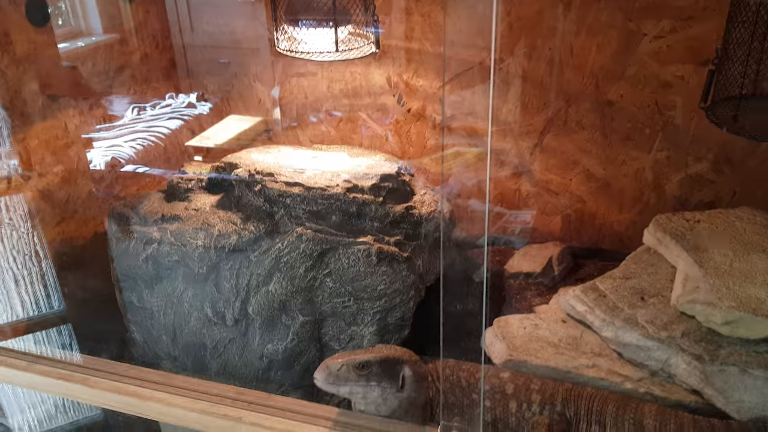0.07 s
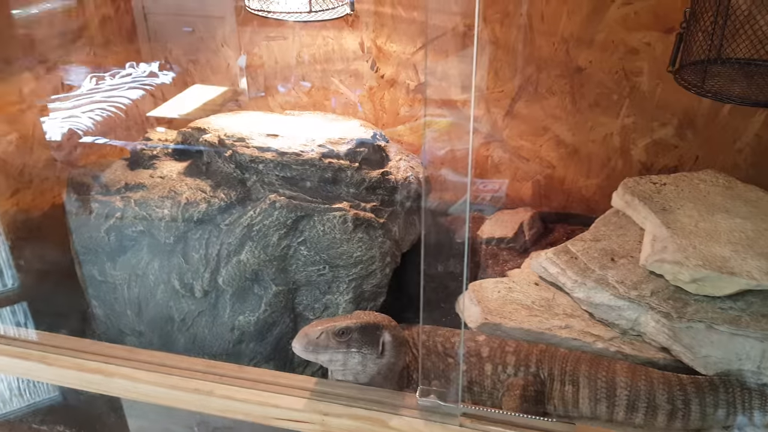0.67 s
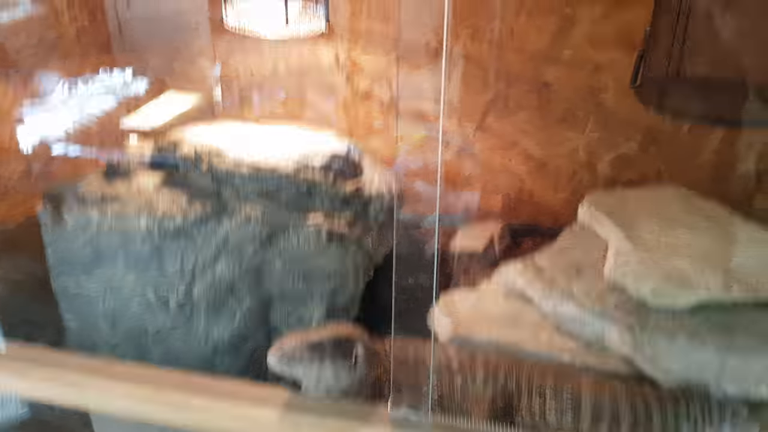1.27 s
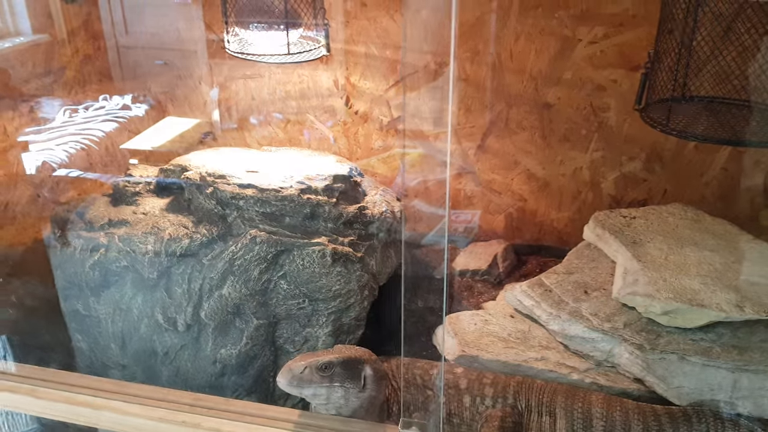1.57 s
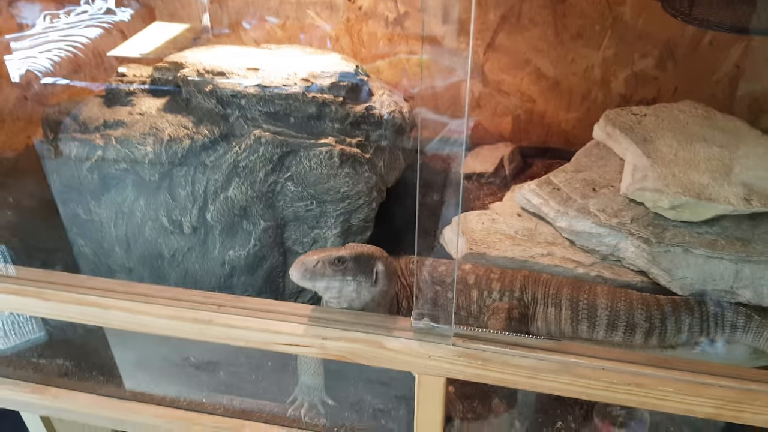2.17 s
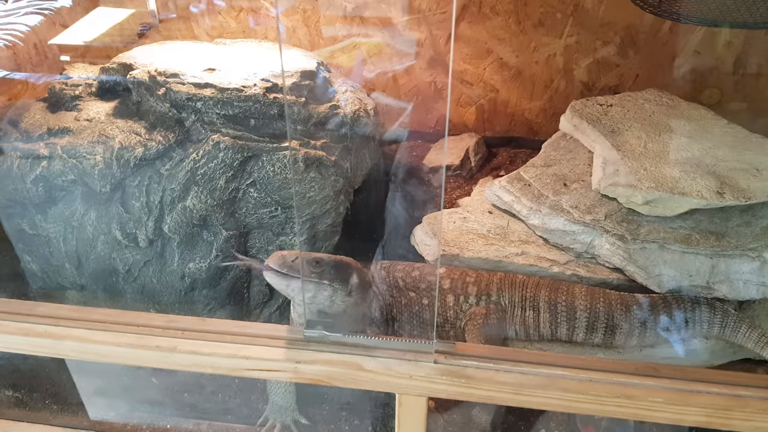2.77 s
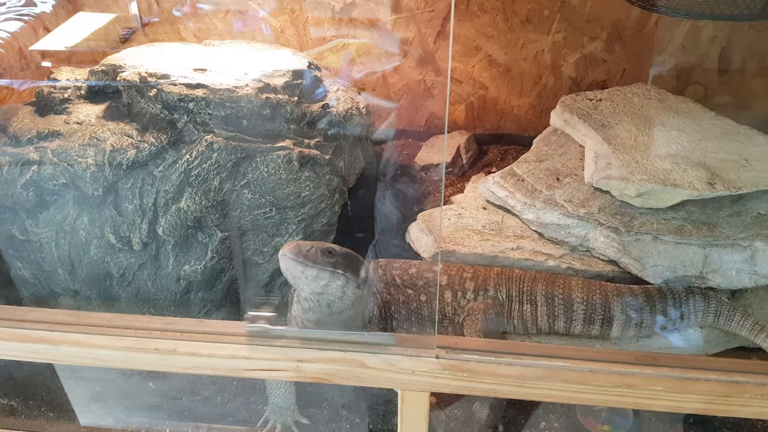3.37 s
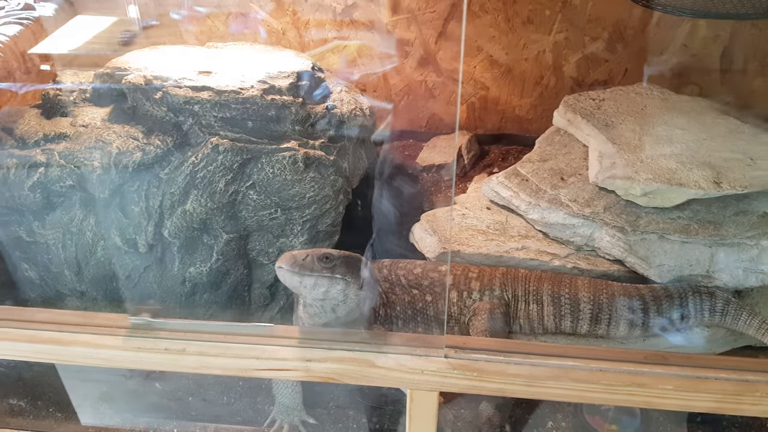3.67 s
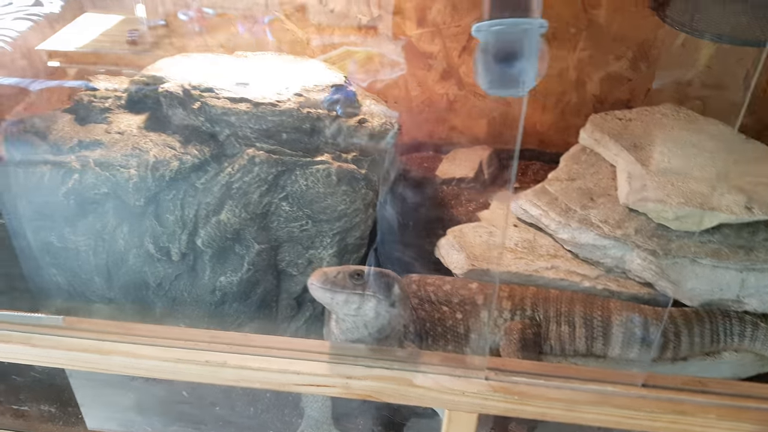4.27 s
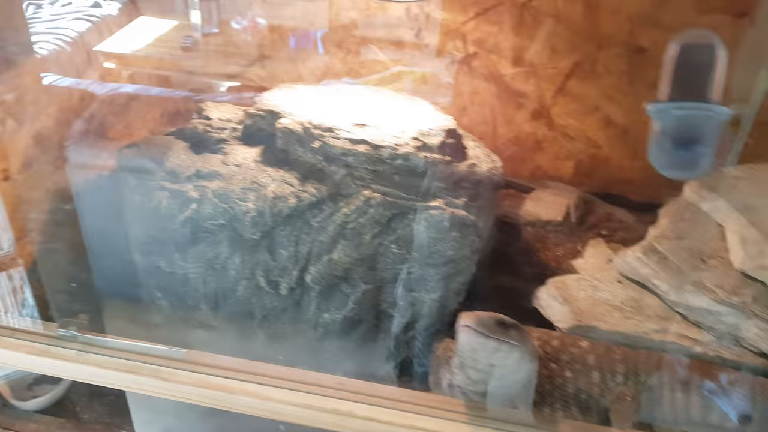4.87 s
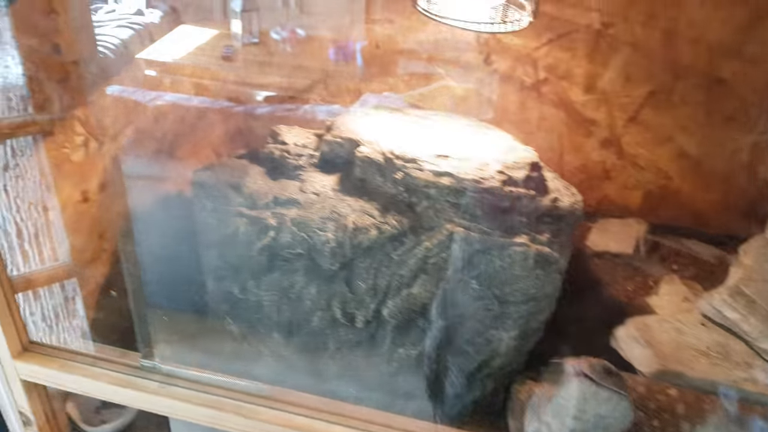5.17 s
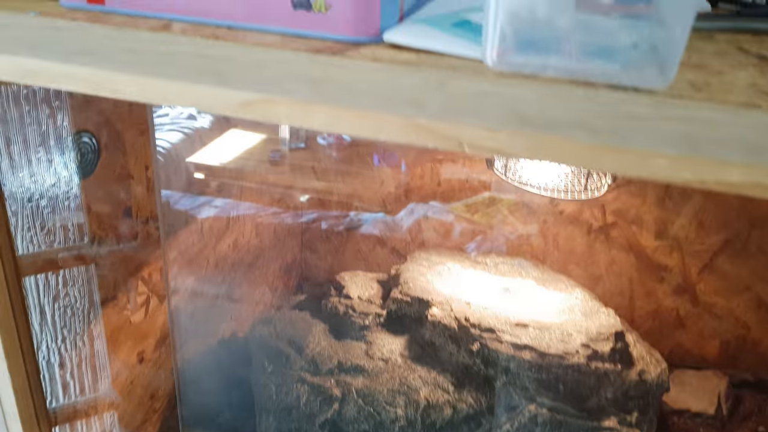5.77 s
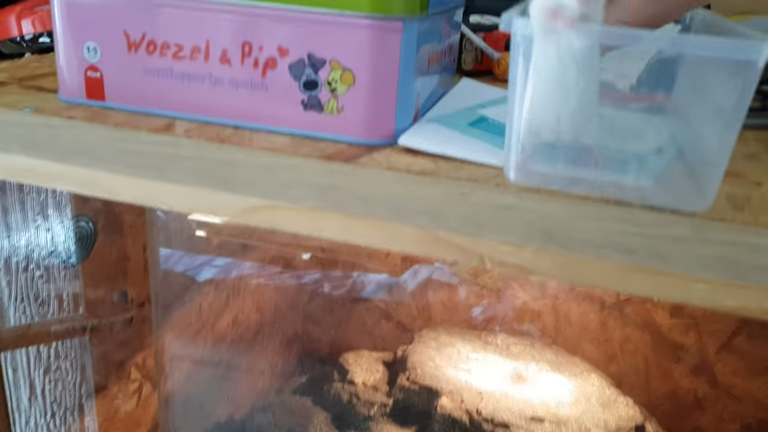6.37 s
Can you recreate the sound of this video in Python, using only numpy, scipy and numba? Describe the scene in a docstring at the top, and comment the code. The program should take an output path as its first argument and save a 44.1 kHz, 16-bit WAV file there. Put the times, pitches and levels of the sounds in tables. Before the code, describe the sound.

A monitor lizard hisses twice in its enclosure, a short breath then a long one, with microphone bumps and a faint hum.

```python
"""A hissing monitor lizard

The lizard hisses twice in a wooden, glass-fronted box: a short breath, then a long one as its mouth
opens. Air tears through the throat, spits, whistles and booms between the walls. Fingers bump the
phone, things knock on the wood, and a faint hum goes on behind it all."""
import sys
import numpy as np
from scipy import signal
from scipy.fft import rfft, irfft
from scipy.io import wavfile
from numba import njit

SR = 44100
rng = np.random.default_rng(int(sys.argv[2]) if len(sys.argv) > 2 else 0)


def transcribe(signal):
    """Save signal, clipped to [-1, 1], as a 16-bit WAV file at the path in sys.argv[1]."""
    frames = np.atleast_2d(signal).T
    limited = np.clip(frames, -1, 1)
    pcm = np.round(limited * 32767).astype(np.int16)
    wavfile.write(sys.argv[1], SR, pcm)


N = 287973
TIME = np.arange(N) / SR

# tone of the quiet room: pitch_hz, level_db
ROOM_TONE = [(25, -0.5), (140, 0), (330, 2.5), (500, -17), (800, -28.5), (4500, -29), (9000, -35.5),
             (13000, -27.5), (16000, -35)]
# tone of a faint, high whirr: pitch_hz, level_db
WHIRR_TONE = [(1000, -16.5), (1600, -5), (1950, -10), (2350, -1), (3100, -1.5), (3450, -8), (3950, 0.5),
              (4400, -28.5), (6000, -45)]
# notes of the hum: pitch_hz, level_db
HUM_NOTES = [(129, -69), (2299, -77), (2412, -78)]
# tone of a dull, low drone: pitch_hz, level_db
DRONE_TONE = [(50, -9.5), (150, -3.5), (480, 5), (800, -18), (2000, -44)]
# swells of that drone: peak_s, level_db
DRONE_SWELLS = [(1.13, -54), (6.33, -54)]
SWELL_RISE_S, SWELL_FALL_DB_PER_S = 0.21, 21.5
DRONE_DB, DRONE_SINK_DB_PER_S = -68.5, 1.1  # between the swells
MOTOR_TURNS_PER_S, MOTOR_HZ, MOTOR_WIDTH_HZ = 20, 2320, 260
MOTOR_DB, RUB_FADE_TURNS = -73.5, .3
NEAR_S, NEAR_HALF_S, NEAR_DB = 4.95, 0.14, 3  # the motor is louder as the phone swings past

# soft scuffs: peak_s, level_db, half_length_s
SCUFFS = [(0.148, -52.5, 0.041), (0.314, -51.5, 0.037), (0.59, -53.5, 0.082), (1.934, -58.5, 0.066),
          (5.257, -55, 0.012), (5.35, -58, 0.022), (5.834, -49, 0.028)]
# tone of a scuff: pitch_hz, level_db
SCUFF_TONE = [(400, 7.5), (1000, -4), (3500, 3), (6500, -3.5), (9000, -17), (16000, -9)]
TAP_S, TAP_DB, TAP_FADE_S = 5.763, -51, 0.007
# fingers bumping the left microphone: start_s, thump_db, click_db
FINGER_BUMPS = [(0.3215, -17, -6.5), (0.5585, -22.5, -38), (.809, -20, -42)]
# ticks of the phone case: start_s, level_db, left_minus_right_db
CASE_TICKS = [(.281, -38.5, 20), (0.3185, -32, 8), (0.32, -27.5, 4), (0.5489, -37, -16),
              (0.5773, -32.5, -11), (0.7562, -35.5, 18.5)]
CASE_RING_HZ = 4170
DRAG_START_S, DRAG_LENGTH_S, DRAG_RELEASE_S = .812, 0.061, 0.018
DRAG_DB, DRAG_GROWTH_DB_PER_S = -47.5, 229  # the dragging finger presses ever harder
# knocks on the wood, dull handling bumps and a low thud of breath as the first hiss ends:
# start_s, level_db, treble_limit_hz
KNOCKS_AND_THUDS = [(2.149, -40, 290), (2.745, -41.5, 200), (2.886, -40.5, 100), (2.924, -40, 114),
                    (3.066, -39.5, 121), (3.136, -37, 650), (5.254, -40, 1640), (5.304, -51, 1000),
                    (5.372, -47.5, 1504), (6.123, -50, 280)]
# notes of the wooden frame (a ring time is a fall of 60 dB): pitch_hz, level_db, ring_s
WOOD_NOTES = [(163.7, -3.5, 0.18), (245, 6, 0.027), (304, 0, 0.15), (396, -2.5, 0.067), (486, -6, 0.0703),
              (700, -9, .08), (850, -9.5, 0.12), (1883, -15.5, .07)]

# a short hiss, its sigh, a faint leak and a long hiss (mouth and boom count from the jet's level):
# start_s, length_s, rise_s, jet_db, growth_db_per_s, mouth_db, opening_db_per_s, boom_db
BREATHS = [(2.248, 0.49, 0.086, -30.5, 1, -15, 0, -8.5), (2.677, 0.45, .02, -65, -31.5, 10, -15.5, 12.5),
           (3.058, 0.24, 0.0086, -68.5, 32, 14, -36.5, 20.5),
           (3.185, 1.2174, 0.018, -25, -1.01, -9.3, 7, -11.5)]
RELEASE_S, RELEASE_POWER = 0.1, 1.08  # every breath runs out in the same way
# pushes of the ribs within a breath: peak_s, extra_jet_db, extra_mouth_db, half_length_s
RIB_PUSHES = [(2.375, 3.2, 6, 0.06), (2.638, 4.5, 8.5, 0.07), (3.706, 2, 4.5, 0.042), (3.891, 4, 5, 0.078),
              (4.128, 4.5, 6, 0.085)]
# tone of the booming box: pitch_hz, level_db
BOOM_TONE = [(25, -34.5), (60, -20), (130, -3), (220, -5.5), (400, -1), (520, -3), (650, -7.5),
             (1500, -53.5)]
BOOM_PUSH_SHARE, BOOM_GROWTH_DB_PER_S = 0.81, 5
# notes that build up between the walls (standing waves): pitch_hz
WALL_NOTES_HZ = [137, 184, 204, 344.3, 419.4]
BOOM_RING_S, WALL_RING_CYCLES = 0.14, 70  # the boom dies quickly, the notes ring on
# tone of the rumbling gust of breath: pitch_hz, level_db
GUST_TONE = [(25, -20.5), (70, -3), (110, -2.5), (300, -32.5)]
GUST_DB = -24.5

# notes of the mouth in a wet smack: pitch_hz, level_db, ring_s
SMACK_NOTES = [(1242, -4, 0.09), (1790, -2, .05), (2900, -4, .025)]
SMACK_S, SMACK_DB = 3.0625, -36
# half whistles, from a throaty hoot to a thin squeal: peak_s, level_db, half_length_s, pitch_hz
WHISTLES = [(2.617, -27, 0.013, 350), (3.278, -12, 0.004, 4560), (3.279, -22, 0.01, 2610),
            (3.39, -24, .04, 1212), (3.677, -28, .012, 13600), (3.726, -22, 0.023, 1400),
            (3.92, -29, .03, 640), (4.14, -25, .03, 995)]
WHISTLE_WOBBLE_HZ = 28.17
# wet sizzles where the gap narrows: peak_s, level_db, half_length_s, pitch_hz
SIZZLES = [(2.365, -26, 0.011, 12600), (2.407, -24.5, 0.012, 12900), (3.662, -20.5, 0.015, 13300),
           (3.712, -20, 0.01, 13700), (3.83, -27, 0.068, 10200)]
# tone of the open mouth: pitch_hz, level_db
MOUTH_TONE = [(450, -19), (680, -7), (1100, -4.5), (1600, 0.5), (3900, -2), (5000, -23), (9000, -22.5)]
# the mouth's hollow note as the jaws move: time_s, pitch_hz
MOUTH_PITCH = [(2.6, 1100), (3.28, 1270), (3.45, 1190), (3.52, 955), (3.7, 820), (3.92, 710), (4.08, 990),
               (4.3, 830)]
HOLLOW_DB, HOLLOW_DB_PER_OCTAVE = -7, 8  # from 1 kHz; a narrow mouth rings higher and clearer
# tone of the jet of air: pitch_hz, level_db
JET_TONE = [(400, -43), (1100, -20), (1600, -4), (2400, -1), (4900, -2), (7200, -6.5), (8300, -15),
            (16000, -15)]
# two broad notes of the throat as it tightens and widens: time_s, lower_hz, upper_hz, upper_db
THROAT_NOTES = [(2.33, 2600, 3480, -11.5), (2.601, 2520, 3560, -13), (3.27, 2510, 4500, -11),
                (3.37, 2836, 3820, -12), (3.5, 2877, 4150, -14), (3.66, 2680, 4100, -11.5),
                (3.87, 3080, 3820, -12), (4.0, 2630, 3810, -15), (4.25, 2560, 3587, -12)]
LOWER_DB = -6.5
LOWER_WIDTH_HZ, UPPER_WIDTH_HZ, THROAT_WANDER = 480, 340, .025  # soft walls damp them and keep moving
WIDEN_START_S, WIDEN_S, WIDEN_EDGE_DB = 3.55, 0.6, -3.5  # the gap widens and loses its 5-7 kHz edge
# notes that ring between the glass panes: pitch_hz, level_db
PANE_NOTES = [(1860, -18), (3150, -23), (3790, -23)]
PANE_WIDTH_HZ = 40
# spits of air as the throat snaps open: start_s, level_db, fade_s
SPITS = [(2.233, -34.5, 0.0086), (2.259, -38.5, .025), (2.33, -25, 0.0086), (2.515, -26, .005),
         (2.88, -52, 0.024), (3.0625, -44, 0.0088), (3.13, -45, 0.025), (3.273, -10, 0.01),
         (3.486, -23.5, 0.015)]
# how much louder the lizard is on the left: pitch_hz, left_minus_right_db
SIDE_BALANCE = [(600, 4), (1400, 5), (3800, 8), (6600, 2), (10300, 8), (12500, -2), (15000, -1)]
ROOM_DAMP_HZ, TREBLE_LIMIT_HZ = 6000, 15850  # where the room's echo and the phone lose their treble
PHONE_DRIFT_PER_S = 2.514  # how often the hand carries the phone into a new pattern of echoes


def undb(db):
    """Turn decibels into a gain to multiply by."""
    return 10 ** (np.asarray(db) / 20)


def unit(x):
    """Scale a sound to an average strength (rms) of 1."""
    return x / np.sqrt(np.mean(x ** 2))


def colour(x, points):
    """Shape the tone of a sound with (pitch_hz, level_db) points."""
    hz, db = np.transpose(points)
    bins = np.maximum(np.fft.rfftfreq(N, 1 / SR), 1)
    return irfft(rfft(x) * undb(np.interp(np.log(bins), np.log(hz), db)), N)


def noise(points):
    """Noise of strength 1 with the given tone."""
    return unit(colour(rng.standard_normal(N), points))


def stereo_noise(points, spread):
    """Left and right noise; more spread makes the two less alike."""
    return unit(noise(points) + spread * np.array([[1], [-1]]) * noise(points))


def pan(db):
    """Two gains that make the left louder than the right by db."""
    return undb(np.array([[db], [-db]]) / 2)


def wander(rate):
    """A random drift of strength 1 that turns rate times a second."""
    knots = rng.standard_normal(int(N / SR * rate) + 2)
    return unit(np.interp(TIME * rate, np.arange(len(knots)), knots))


def wavering_note(hz, wobble_hz, rate):
    """A pure note whose pitch drifts."""
    return np.sin(2 * np.pi * np.cumsum(hz + wobble_hz * wander(rate)) / SR)


def fade(start, decay):
    """Start suddenly, then die away."""
    return (TIME >= start) * np.exp(-np.clip((TIME - start) / decay, 0, 50))


def swell(centre, half):
    """Rise and fall in a bell shape."""
    return np.exp(-np.minimum(((TIME - centre) / half) ** 2, 100) / 2)


def envelope(start, length, rise, release):
    """Rise, hold, then fall to silence."""
    falling = np.clip((start + length - TIME) / release, 0, 1) ** RELEASE_POWER
    return np.clip((TIME - start) / rise, 0, 1) * falling


def linger(gain, ring_s):
    """Let a level build up and die away, as it does in a ringing space."""
    keep = np.exp(-2 * np.log(1000) / (ring_s * SR))
    return np.sqrt(signal.lfilter([1 - keep], [1, -keep], gain ** 2 + 1e-18))


@njit
def resonate(x, hz, width):
    """Make a sound ring around a moving pitch (a band-pass filter)."""
    y, band_state, low_state = np.empty(len(x)), 0., 0.
    for i in range(len(x)):
        tuning, damping = np.tan(np.pi * hz[i] / SR), width / hz[i]
        band = (band_state + tuning * (x[i] - low_state)) / (1 + tuning * (tuning + damping))
        band_state = 2 * band - band_state
        low_state += 2 * tuning * band
        y[i] = damping * band
    return y


def ring_at(x, hz, width_hz):
    """Make a sound ring around one steady pitch."""
    return resonate(x, np.full(N, float(hz)), float(width_hz))


def reflect(x, early_db, early_s, late_db, late_s):
    """Add quick echoes off the panes, changing as the phone drifts, and a duller room echo."""
    t, x = TIME[:SR // 2], np.atleast_2d(x)

    def echoes(db, ring_s):
        tail = rng.standard_normal((2, len(t))) * np.exp(-np.log(1000) * t / ring_s)
        tail /= np.linalg.norm(tail, axis=1, keepdims=True)
        return undb(db) * signal.fftconvolve(x, tail, axes=1)[:, :N]

    places = np.array([wander(PHONE_DRIFT_PER_S) for _ in range(3)])
    early = sum(near * echoes(early_db, early_s) for near in places / np.linalg.norm(places, axis=0))
    late = signal.sosfilt(signal.butter(1, ROOM_DAMP_HZ, fs=SR, output="sos"), echoes(late_db, late_s))
    return (x + early + late) / np.sqrt(1 + undb(early_db) ** 2 + undb(late_db) ** 2)


def background():
    """The quiet room, a faint whirr, a wavering hum and a low drone that swells."""
    room = undb(-60) * stereo_noise(ROOM_TONE, spread=0.46) * undb(wander(3.4))
    whirr = undb(-63) * stereo_noise(WHIRR_TONE, spread=1.0) * undb(0.6 * wander(16)) * pan(4.2)
    hum = sum(undb(db + 2 * wander(3.7)) * np.sqrt(2) * wavering_note(hz, wobble_hz=3, rate=17)
              for hz, db in HUM_NOTES)
    swells = sum(np.clip(1 + (TIME - s) / SWELL_RISE_S, 0, 1)
                 * undb(db - SWELL_FALL_DB_PER_S * np.maximum(TIME - s, 0)) for s, db in DRONE_SWELLS)
    resting = undb(DRONE_DB - DRONE_SINK_DB_PER_S * TIME)
    drone = stereo_noise(DRONE_TONE, spread=0.41) * np.hypot(swells, resting)
    return room + whirr + hum + drone


def motor():
    """A small motor rubs once a turn, and each rub rings with a thin note."""
    rubs = rng.standard_normal(N) * np.exp(-(TIME * MOTOR_TURNS_PER_S % 1) / RUB_FADE_TURNS)
    ring = unit(ring_at(rubs, MOTOR_HZ, MOTOR_WIDTH_HZ))
    return ring * undb(MOTOR_DB + NEAR_DB * swell(NEAR_S, NEAR_HALF_S)) * pan(3)


def scuffs():
    """Brief grainy rubs that catch hardest at one point, and a light, dry tap before the last."""
    grip = sum(undb(db) * np.exp(-np.minimum(abs(TIME - s) / half, 50)) for s, db, half in SCUFFS)
    rubs = stereo_noise(SCUFF_TONE, spread=0.99) * grip
    tap = stereo_noise([(400, -27), (950, 6), (8000, -43)], spread=0.48)
    return rubs * undb(2 * wander(250)) + tap * undb(TAP_DB) * fade(TAP_S, TAP_FADE_S)


def knocks_and_thuds():
    """Each blow rings and dies away, with its own treble limit, from dull thud to bright knock."""
    t, out = TIME[:SR // 2], np.zeros((2, N + SR))
    for s, db, limit_hz in KNOCKS_AND_THUDS:
        ring = sum(undb(note_db) * np.exp(-np.log(1000) * t / ring_s)
                   * np.sin(2 * np.pi * hz * t + rng.uniform(0, 2 * np.pi))
                   for hz, note_db, ring_s in WOOD_NOTES)
        dying = undb(1) * np.exp(-t / 0.011) + undb(-2) * np.exp(-t / 0.059)
        rattle = rng.standard_normal((2, len(t))) * dying
        blow = signal.sosfilt(signal.butter(3, limit_hz, fs=SR, output="sos"), ring + rattle)
        start = int(s * SR)
        out[:, start:start + len(t)] += undb(db) * blow / blow[:, :SR // 50].std()
    return out[:, :N]


def fingers():
    """Fingers thump, click and drag on the left microphone, and the phone case ticks."""
    thumps = sum(undb(db) * fade(s, 0.0039) * np.cos(2 * np.pi * 125 * (TIME - s) + 0.58)
                 for s, db, _ in FINGER_BUMPS)
    jolts = sum(undb(db) * signal.unit_impulse(N, int(s * SR)) for s, _, db in FINGER_BUMPS)
    clicks = colour(jolts, [(100, 15), (450, 17.5), (1500, 1), (7000, 8.5), (16000, -4)])
    case = noise([(300, 10.5), (2000, -6), (4000, 13.5), (8000, -7), (13000, 3), (16000, -4)])
    case += undb(-6.5) * np.sin(2 * np.pi * CASE_RING_HZ * TIME)
    ticks = case * sum(undb(db) * pan(side_db) * fade(s, 0.00057) for s, db, side_db in CASE_TICKS)
    press = envelope(DRAG_START_S, DRAG_LENGTH_S, 0.0026, DRAG_RELEASE_S)
    press *= undb(DRAG_DB + DRAG_GROWTH_DB_PER_S * np.clip(TIME - DRAG_START_S, 0, DRAG_LENGTH_S))
    drag = noise([(100, -6), (450, -2), (1900, -10.5), (3000, -16.5), (16000, -35)])
    drag *= press * undb(1.3 * wander(370))
    touches = (thumps + clicks + drag) * np.array([[1], [undb(-32)]])
    return touches + reflect(ticks, early_db=-3.5, early_s=0.044, late_db=-4.5, late_s=0.39)


def breathing():
    """Gains of jet, mouth and boom: each breath rises and runs out as the jaw opens and ribs push."""
    push_db = sum(db * swell(s, half) for s, db, _, half in RIB_PUSHES)
    mouth_push_db = sum(db * swell(s, half) for s, _, db, half in RIB_PUSHES)
    jet_gain, mouth_gain, boom_gain = np.zeros((3, N))
    for start, length, rise, db, growth, mouth_db, opening, boom_db in BREATHS:
        age = np.clip(TIME - start, 0, length)
        flow = envelope(start, length, rise, RELEASE_S) * undb(db + growth * age)
        jet_gain += flow * undb(push_db)
        mouth_gain += flow * undb(mouth_push_db + mouth_db + opening * age)
        boom_gain += flow * undb(BOOM_PUSH_SHARE * push_db + boom_db + BOOM_GROWTH_DB_PER_S * age)
    return jet_gain, mouth_gain, boom_gain


def box_boom(flow, boom_gain):
    """The low part of the breath booms and rings between the walls, while the gust rumbles."""
    air = rng.standard_normal(N)
    notes = [ring_at(ring_at(air, hz, width_hz=29), hz, width_hz=29) for hz in WALL_NOTES_HZ]
    walls = sum(note * linger(boom_gain, WALL_RING_CYCLES / hz) for note, hz in zip(notes, WALL_NOTES_HZ))
    walls /= np.std(sum(notes))
    boom = stereo_noise(BOOM_TONE, spread=.25) * linger(boom_gain, BOOM_RING_S)
    gust = stereo_noise(GUST_TONE, spread=.2) * flow
    return undb(-4) * boom + undb(-3) * walls + undb(GUST_DB) * gust


def smack():
    """The wet jaws part with a click that rings the mouth."""
    return undb(SMACK_DB) * sum(
        undb(db) * fade(SMACK_S, ring_s / np.log(1000)) * np.sin(2 * np.pi * hz * (TIME - SMACK_S))
        for hz, db, ring_s in SMACK_NOTES)


def whistles():
    """Air catches on an edge and half whistles, unsteady in pitch and strength."""
    return sum(undb(db + 2 * wander(120)) * swell(s, half) * wavering_note(hz, WHISTLE_WOBBLE_HZ, 200)
               for s, db, half, hz in WHISTLES)


def sizzle():
    """Spurts of high hiss ring in the narrow gap, and bursting spit breaks them into crackles."""
    out = 0
    for s, db, half, hz in SIZZLES:
        spray = rng.standard_normal(N) * undb(5 * wander(700))
        crackle = colour(ring_at(spray, hz, 0.22 * hz), [(8800, -13), (9900, -2.5)])
        out += undb(db) * swell(s, half) * unit(crackle)
    return out


def mouth():
    """The open mouth lets the lower hiss out, with a hollow note that sinks as the jaw drops."""
    hz = np.interp(TIME, *np.transpose(MOUTH_PITCH))
    hollow = unit(resonate(rng.standard_normal(N), hz, width=110.))
    hollow *= undb(HOLLOW_DB + HOLLOW_DB_PER_OCTAVE * np.log2(hz / 1000))
    throaty = unit(resonate(resonate(rng.standard_normal(N), hz, width=900.), hz, width=900.))
    return noise(MOUTH_TONE) + hollow + throaty


def air_jet(flow):
    """Rushing air rings the shifting throat and the panes; a weak flow or a wider gap is duller."""
    air = rng.standard_normal(N)
    times, *tracks = np.transpose(THROAT_NOTES)
    lower_hz, upper_hz, upper_db = (np.interp(TIME, times, track) for track in tracks)
    throat = 0
    for hz, width, db in [(lower_hz, LOWER_WIDTH_HZ, LOWER_DB), (upper_hz, UPPER_WIDTH_HZ, upper_db)]:
        gain = undb(db + 2 * wander(9))
        note = resonate(rng.standard_normal(N), hz * (1 + THROAT_WANDER * wander(22)), float(width))
        throat += gain * unit(note)
    panes = sum(undb(db + 2.6 * wander(4.9)) * unit(ring_at(air, hz, PANE_WIDTH_HZ))
                for hz, db in PANE_NOTES)
    hiss = unit(noise(JET_TONE) + throat + panes)
    edge = colour(hiss, [(4300, -26), (5300, -1), (6800, 1), (9000, -22.5)])
    widened = np.clip((TIME - WIDEN_START_S) / WIDEN_S, 0, 1)
    hiss -= edge * (1 - undb(WIDEN_EDGE_DB * widened))
    treble = colour(hiss, [(4500, -30), (8000, 2.5)])
    surges = undb(1.5 * wander(28))  # moisture makes the treble surge
    brightness = np.minimum(flow / undb(-32.5), 1) ** .35
    return flow * (hiss - treble + treble * surges * brightness)


def lizard(flow, mouth_gain):
    """Two hisses: the jet, mouth, sizzles and whistles flutter together in one stream of air."""
    jet_gain = undb(4) * flow + sum(undb(db) * fade(s, decay) for s, db, decay in SPITS)
    flutter = undb(1.1 * wander(35) + 1.4 * wander(300))  # moisture in the throat roughens the flow
    # swirling air sounds different in each direction, so left and right share only part of the hiss
    shared, apart = (air_jet(jet_gain) + mouth() * mouth_gain + sizzle() + whistles() for _ in range(2))
    apart = colour(apart, [(400, -12), (1500, -9.5), (7000, 1)])
    air = undb(-2) * (shared + apart * np.array([[1], [-1]])) * flutter + smack()
    left, right = reflect(air, early_db=-1, early_s=0.065, late_db=-9, late_s=0.45)
    return np.array([colour(left, [(hz, db / 2) for hz, db in SIDE_BALANCE]),
                     colour(right, [(hz, -db / 2) for hz, db in SIDE_BALANCE])])


def scene():
    """Everything that reaches the two microphones."""
    flow, mouth_gain, boom_gain = breathing()
    hisses = lizard(flow, mouth_gain) + box_boom(flow, boom_gain)
    return hisses + knocks_and_thuds() + fingers() + scuffs() + background() + motor()


def record(dry):
    """The phone starts listening after a moment, rounds the loudest peaks and cuts the top treble."""
    fade_in = np.clip((TIME - .065) / .02, 0, 1)
    treble_cut = signal.ellip(10, .2, 75, TREBLE_LIMIT_HZ, fs=SR, output="sos")
    return signal.sosfilt(treble_cut, np.tanh(dry * fade_in))


dry = scene()
out = record(dry)
transcribe(out)
```